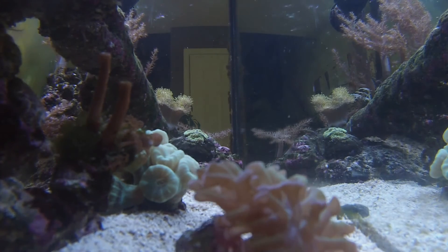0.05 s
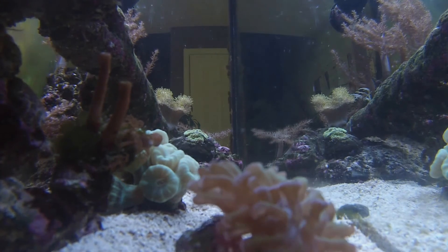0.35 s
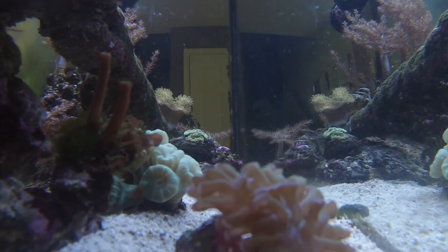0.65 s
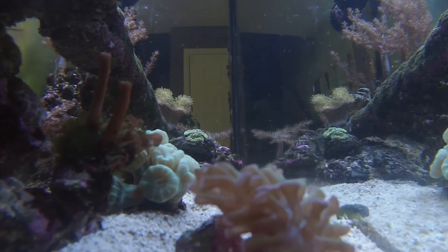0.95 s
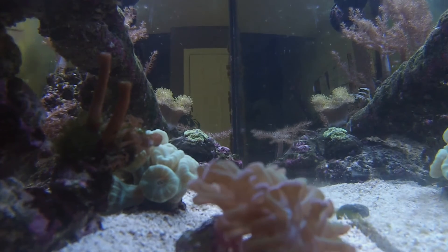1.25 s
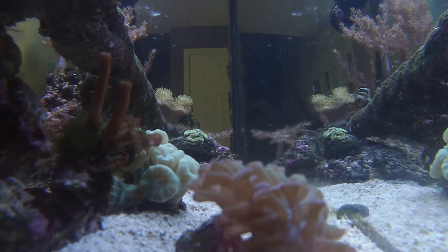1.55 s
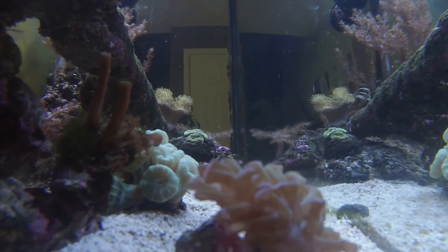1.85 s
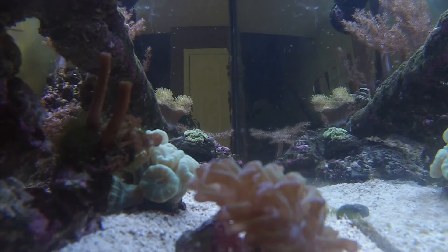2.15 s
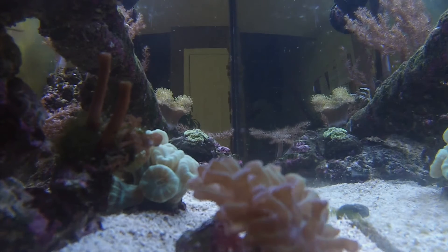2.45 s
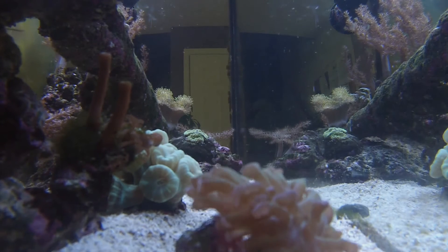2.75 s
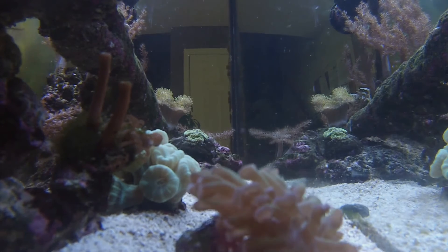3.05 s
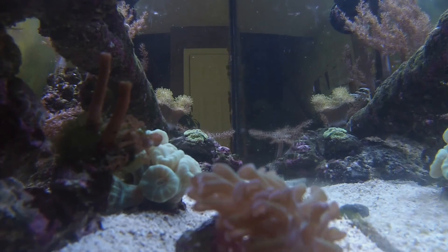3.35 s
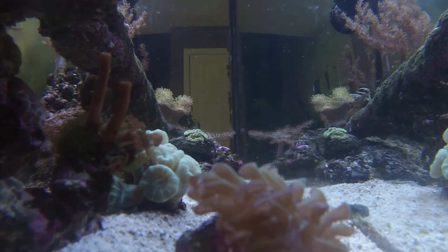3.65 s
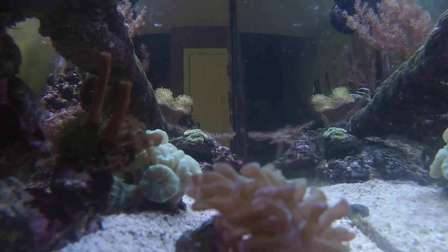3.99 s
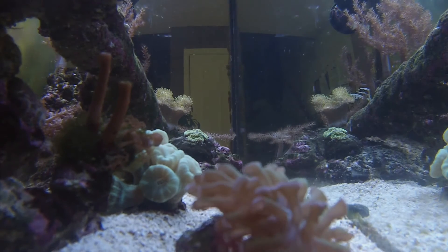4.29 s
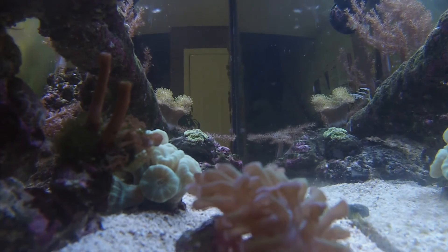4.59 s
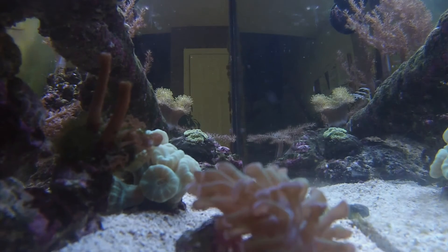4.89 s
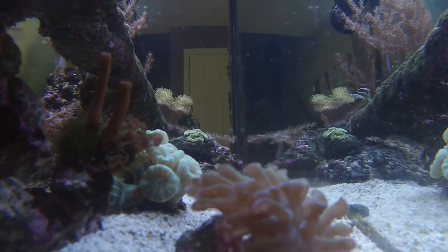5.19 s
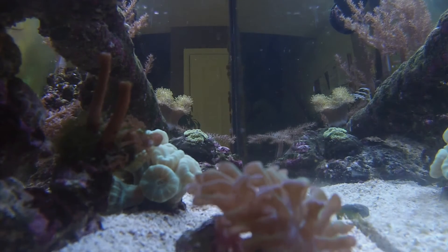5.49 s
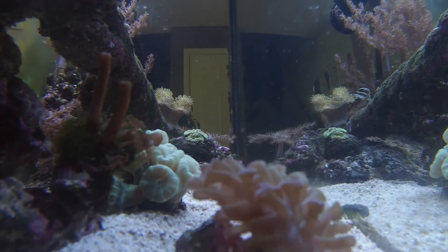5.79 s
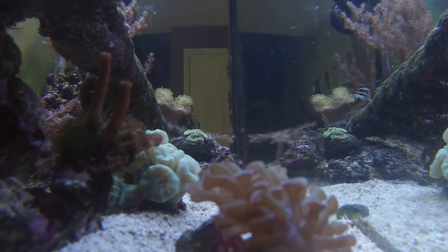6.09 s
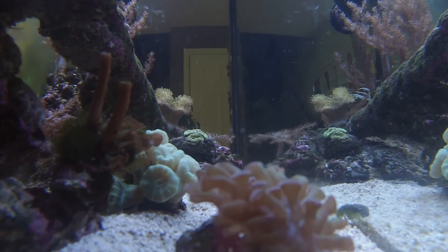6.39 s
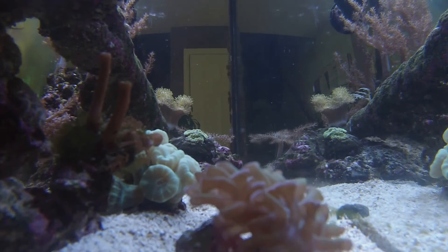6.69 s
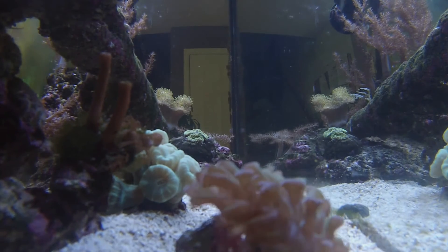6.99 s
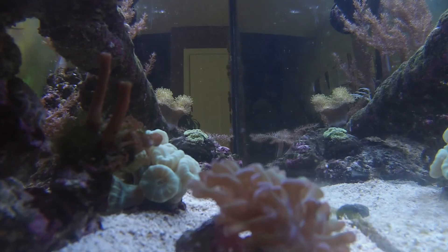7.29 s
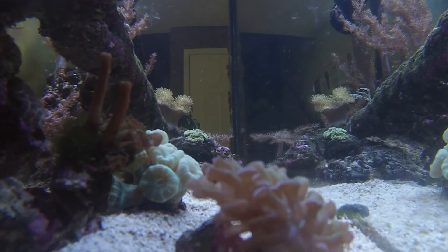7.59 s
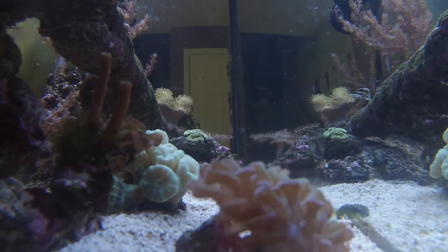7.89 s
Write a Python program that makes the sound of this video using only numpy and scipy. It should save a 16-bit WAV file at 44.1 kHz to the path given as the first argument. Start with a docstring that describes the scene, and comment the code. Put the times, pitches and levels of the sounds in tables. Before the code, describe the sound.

Water pumps run steadily in an aquarium, heard through a submerged microphone in a waterproof housing. A low electric hum leads, with a thin whine and a very fast, gritty rattle that rings brightly above it. Circulating water adds a low rumble underneath. Tiny snaps come at random over a faint hiss, and the sound stays the same throughout.

```python
"""Water pumps run steadily in a reef tank; the microphone sits under water with them, inside a
waterproof housing. A mains-driven rotor hums, its impeller whines, and it knocks twice a turn:
the gritty rattle rings the tank and the housing, the light knock taps the pump casing, and now
and then the heavy one snaps. The circulating water adds a low rumble, with a faint hiss above it."""
import sys
import numpy as np
from scipy import signal
from scipy.fft import rfft, irfft
from scipy.io import wavfile

SR = 44100
rng = np.random.default_rng(int(sys.argv[2]) if len(sys.argv) > 2 else 0)


def int16_out(signal):
    """Quantize to a 16-bit WAV file."""
    q = np.round(np.clip(np.atleast_2d(signal).T, -1, 1) * 32767)
    wavfile.write(sys.argv[1], SR, q.astype(np.int16))


N = 358974
TIME = np.arange(N) / SR
MAINS_HZ, START_TURN = 60.001, -.157  # the rotor makes one turn per mains cycle
# rotor knocks, heavy then light: (place [turns], relative strength [dB], rubbing time [s])
ROTOR_KNOCKS = [(.475, 2.5, 0.0046), (.955, -2, 0.0061)]


def from_db(db):
    """Decibels to gain."""
    return 10 ** (np.asarray(db) / 20)


def rms_one(x):
    """Scale to rms 1."""
    return x / np.sqrt(np.mean(x ** 2) + 1e-20)


def per_hz(x):
    """Scale a white excitation to 0 dB per Hz."""
    return rms_one(x) * np.sqrt(SR / 2)


def drift(rate):
    """Slow random wander of spread 1, changing about rate times a second."""
    step, settle = 40, 2000  # audio samples per point, points dropped while the filter settles
    pole = np.exp(-2 * np.pi * rate * step / SR)
    noise = rng.standard_normal(N // step + settle + 2)
    slow = signal.lfilter([1], [1, -2 * pole, pole * pole], noise)[settle:]
    return np.interp(np.arange(N) / step, np.arange(len(slow)), rms_one(slow))


def rotor_tones(harmonics, lag_turns, waver_db, waver_rate):
    """Tones locked to the rotor, each wavering a little in level."""
    turn = MAINS_HZ * TIME + START_TURN - lag_turns
    return np.sqrt(2) * sum(from_db(db + waver_db * drift(waver_rate)) * np.sin(2 * np.pi * k * turn)
                            for k, db in harmonics)


def motor_hum():
    """The motor hums magnetically at odd multiples of the rotor speed."""
    # hum tones: (frequency [multiple of rotor speed], rms level [dB])
    hum_harmonics = [(1, -32), (3, -36.5), (5, -56)]
    return rotor_tones(hum_harmonics, lag_turns=0, waver_db=0.53, waver_rate=3.4)


def impeller_whine():
    """The impeller buzzes and whines, lagging the rotor by part of a turn."""
    # impeller tones: (frequency [multiple of rotor speed], rms level [dB])
    whine_harmonics = [(2, -52), (4, -55), (6, -76.5), (7, -61), (8, -65.5), (9, -64.5), (10, -80),
                       (11, -56), (12, -54), (14, -69.5), (16, -71.5), (17, -71), (23, -75.5)]
    return rotor_tones(whine_harmonics, lag_turns=.637, waver_db=0.77, waver_rate=6.3)


def each_turn(place, uneven_db, jitter_s):
    """One impulse at the same place of every turn, a little uneven in time and strength."""
    turns = np.arange(int(N / SR * MAINS_HZ) + 2)
    late, force = rng.standard_normal((len(turns), 2)).T
    at = (((turns + place - START_TURN - 1) / MAINS_HZ + jitter_s * late) * SR).astype(int)
    inside = (at >= 0) & (at < N)
    train = np.zeros(N)
    train[at[inside]] = from_db(uneven_db * force)[inside]
    return train


def fade(train, seconds):
    """Each impulse jumps up and dies away."""
    return signal.lfilter([1], [1, -np.exp(-1 / (seconds * SR))], train + 1e-18)


def contact(knocks, uneven_db, jitter_s, tick, tick_s, tick_uneven_db):
    """Pressure of rotor on shaft: each knock is a short tick and a slower fading rub."""
    pressure = 0
    for place, db, rub_s in knocks:
        rub = fade(each_turn(place, uneven_db, jitter_s), rub_s)
        hit = tick * fade(each_turn(place, tick_uneven_db, jitter_s), tick_s)
        pressure = pressure + from_db(db) * (rub + hit)
    return rms_one(pressure)


def grit(grain_db):
    """White friction noise made of tiny impacts of uneven size."""
    return rms_one(rng.standard_normal(N) * from_db(grain_db * rng.standard_normal(N)))


def ring_body(force, modes, size=8192):
    """One force rings all resonances of a body: prompt attack, then decay (minimum phase)."""
    f = np.maximum(np.fft.rfftfreq(size, 1 / SR), 1)
    power = sum((from_db(db) / (1 + ((f * f - hz * hz) / (f * width)) ** 2)) ** 2
                for hz, width, db in modes)
    cepstrum = irfft(np.log(power + 1e-18))[:size // 2]
    cepstrum[0] /= 2
    impulse_response = irfft(np.exp(rfft(cepstrum, size)))
    return signal.fftconvolve(force, impulse_response)[:N]


def rotor_rattle():
    """Both knocks scrape the housing into a bright ring; the heavy one also shakes the tank."""
    # bright resonances of shaft and housing: (frequency [Hz], width [Hz], relative level [dB])
    housing_modes = [(2732, 67, -83.5), (2932, 180, -75), (3048, 106, -68.5), (3506, 124, -89.5),
                     (4094, 198, -73.5), (4463, 212, -78.5), (5040, 250, -92.5), (5470, 194, -83),
                     (5824, 630, -84.5), (6540, 570, -92.5), (6804, 350, -89), (7370, 225, -95.5),
                     (7750, 450, -93), (8380, 340, -95.5), (8940, 400, -99.8), (9250, 550, -103.0),
                     (10800, 930, -105.7), (12400, 1200, -106.0), (14300, 1300, -110.6)]
    # resonances of the tank: (frequency [Hz], width [Hz], relative level [dB])
    tank_modes = [(526, 37, -80.5), (594, 52, -78), (676, 87, -73.5), (725, 136, -79), (850, 44, -86.5),
                  (1000, 280, -85), (1137, 115, -85.5)]
    effort = from_db(0.25 * drift(2.4))
    pressure = contact(ROTOR_KNOCKS, uneven_db=0.94, jitter_s=0.00017,
                       tick=0.2, tick_s=0.0013, tick_uneven_db=3.5)
    friction = per_hz(effort * (pressure + 0.041) * grit(grain_db=1.5))
    shake = contact(ROTOR_KNOCKS[:1], uneven_db=0.7, jitter_s=0.00026,
                    tick=.05, tick_s=0.00087, tick_uneven_db=9.0)
    stirring = per_hz(shake * grit(grain_db=0.5) + 2.0 * rng.standard_normal(N))
    housing_ring = from_db(-0.3) * ring_body(friction, housing_modes)
    tank_ring = from_db(-0.5) * ring_body(stirring, tank_modes)
    return housing_ring + tank_ring


def casing_taps():
    """The lighter knock of each turn taps the casing, which the passing water also stirs."""
    # resonances of the pump casing: (frequency [Hz], width [Hz], level [dB per Hz])
    casing_modes = [(1343, 101, -83), (1423, 94, -84.5), (1590, 78, -81.5), (1701, 86, -80),
                    (1846, 40, -89.5), (1938, 84, -86), (2107, 190, -90.5), (2305, 82, -89),
                    (2514, 220, -93)]
    taps = each_turn(ROTOR_KNOCKS[1][0], uneven_db=1.5, jitter_s=0.0002)
    swirl = from_db(0.81 * drift(17.0)) * grit(grain_db=1.0)
    return ring_body(per_hz(0.56 * rms_one(taps) + swirl), casing_modes)


def resonate(x, hz, width, order):
    """A resonance with gain 1 at its peak, passed order times."""
    r = np.exp(-np.pi * width / SR)
    gain = (1 - r * r) / 2
    section = [gain, 0, -gain, 1, -2 * r * np.cos(2 * np.pi * hz / SR), r * r]
    return signal.sosfilt([section] * order, x)


def water_rumble():
    """Turbulence stirs each low resonance of the water separately."""
    # resonances of the moving water: (frequency [Hz], width of one pass [Hz], level [dB per Hz])
    water_modes = [(41, 44, -61.5), (96, 52, -60.5), (121.8, 5.5, -63), (165.3, 53, -68.5),
                   (223.3, 46, -70.5), (294.5, 94, -78.5), (362.6, 67, -79.5), (437, 370, -88.5)]
    return sum(from_db(db) * resonate(per_hz(rng.standard_normal(N)), hz, width, order=3)
               for hz, width, db in water_modes)


def knock_snaps(snaps_per_s=1.5):
    """A few heavy knocks, at random, land hard enough to give a tiny bright snap."""
    knocks = each_turn(ROTOR_KNOCKS[0][0], uneven_db=1.3, jitter_s=.0003)
    hard = rng.random(N) < snaps_per_s / MAINS_HZ
    burst = fade(knocks * hard, seconds=.0008) * rng.standard_normal(N)
    return from_db(-48) * resonate(burst, hz=8500, width=7000, order=2)


def hiss():
    """Faint hiss with a fine crackle in it."""
    return from_db(-110.5) * per_hz(grit(grain_db=2.5))


def scene():
    """Pumps and moving water reach one submerged microphone."""
    tones = motor_hum() + impeller_whine()
    return (tones + rotor_rattle() + casing_taps() + water_rumble() + knock_snaps() + hiss())[None]


def record(dry):
    """The microphone's signal is cut steeply above 14.7 kHz."""
    return signal.sosfilt(signal.ellip(10, .1, 90, 14700, fs=SR, output="sos"), dry)


dry = scene()
out = record(dry)
int16_out(out)
```